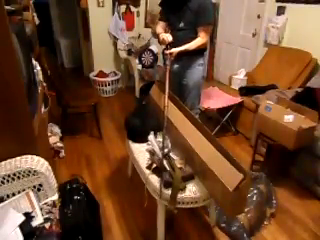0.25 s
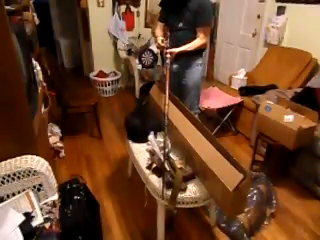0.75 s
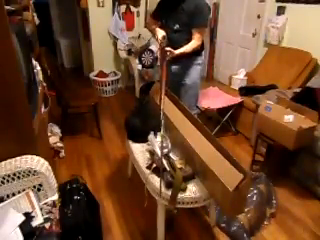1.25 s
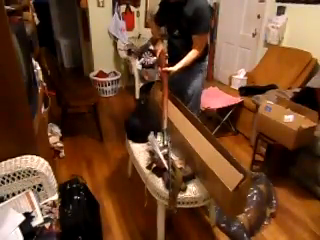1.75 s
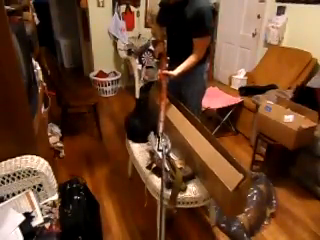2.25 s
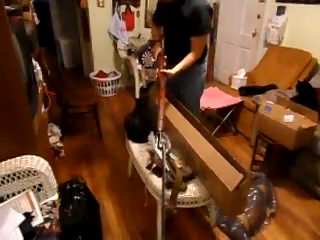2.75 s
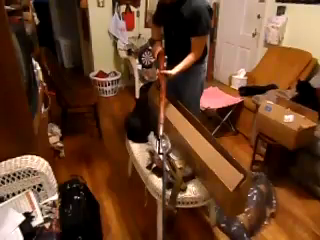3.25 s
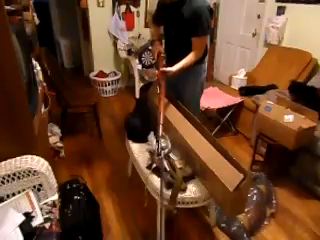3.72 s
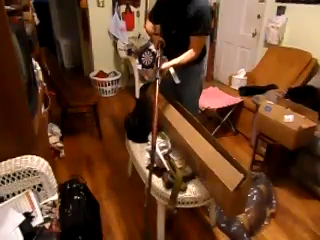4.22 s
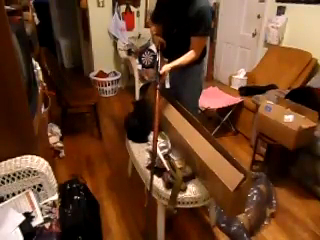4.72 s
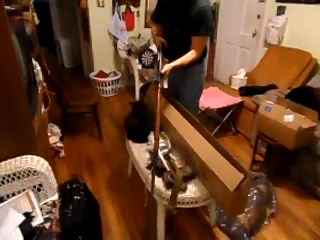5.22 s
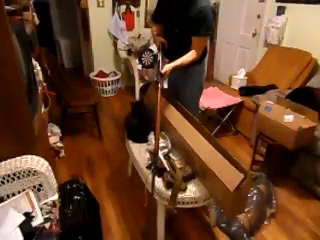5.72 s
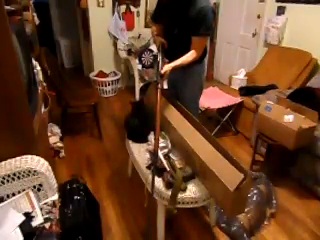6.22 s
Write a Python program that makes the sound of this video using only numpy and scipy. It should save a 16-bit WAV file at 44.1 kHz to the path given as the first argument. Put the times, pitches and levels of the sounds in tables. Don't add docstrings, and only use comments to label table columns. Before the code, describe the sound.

A small camera a few metres away in a furnished room hears steady hiss, faint electrical buzz with a thin high whine, and low floor rumble. From 0 s a rifle bolt is worked: a faint tick, a short steel scrape at 0.1, clacks around 0.22, another slide, then a loud ringing slam at 0.53 and a last short slide ending in a firm clack at 0.72. A light tap comes at 0.9 and a buckle tick at 1.1. Soft hand rubs and knocks follow from 1.3 to 1.6. From 1.8 to 2.45 the butt drags and bumps the boards with dull low thuds. Between 2.7 and 3.7 the swivel knocks the hollow stock amid tiny jingles. Then near quiet, with one faint bump at 4.46, until a sharp, bright striker snap at 6.03 with a brief room tail and low floor thud, fading into hiss.

```python
import sys
import numpy as np
from scipy import signal
from scipy.fft import rfft, irfft
from scipy.io import wavfile
from scipy.ndimage import uniform_filter1d

SR = 44100
rng = np.random.default_rng(int(sys.argv[2]) if len(sys.argv) > 2 else 0)


def to_wav(s):
    ch = np.atleast_2d(s).T
    pcm = np.round(np.clip(ch, -1, 1) * 32767)
    wavfile.write(sys.argv[1], SR, pcm.astype(np.int16))


def elevation(decibels):
    levels = np.asarray(decibels, float)
    return 10 ** (levels / 20)


N = 285327

# (frequency [Hz], density [dB per Hz])
HISS = [(180, -1), (300, -2), (970, -3.5), (3830, -10.5), (4590, -12), (8750, -15.5), (10100, -15),
        (11200, -17), (15600, -13.5)]
HISS_DB, HISS_EDGE_HZ = -65, 15760
FRAME_HZ, ROW_HZ, WHINE_HZ = 29.976, 1320, 9884
EDGE_HZ = 15880

# (frequency [Hz], time to fall 60 dB [s])
ROOM_DECAY = [(150, 0.069), (500, 0.26), (1500, 0.18), (3000, 0.2), (6500, 0.19), (10000, 0.13),
              (15000, 0.13)]

# (time [s], level over the quiet floor [dB])
FLOOR_SWELL = [(0, 4.5), (.15, -1), (0.349, 3.5), (.8, 9.5), (1.1, 2), (1.7, -0.5), (1.92, 9), (2.15, -4),
               (2.4, 11), (2.6, 3), (3.299, -2), (4.3, 3.5), (5.101, -0.5), (6.0, -0.5), (6.47, 3)]
RUMBLE_DB, CREAK_DB, RUMBLE_SHARE = -54, -66, 0.43
# (time [s], level [dB], time to fall 30 dB [s])
JOIST_THUDS = [(1.8, -62, 0.05), (1.875, -51, 0.32), (1.991, -52, 0.41), (2.197, -65, 0.16),
               (2.36, -50, 0.088), (2.392, -49, 0.046), (2.439, -52, 0.43), (6.02, -43.5, 0.082)]
JOIST_HZ = 21.7

# (frequency [Hz], width [Hz], level [dB])
BOARD_MODES = [(88, 26, -0.5), (235, 15, 3), (352, 10, -10), (760, 29, 7)]
BUTT_AT = [1.797, 1.871, 2.02, 2.202, 2.266, 2.359, 2.391, 2.421, 4.46]
# (level [dB], upper edge of the push [Hz])
BUTT_BUMPS = [(-49, 320), (-48, 600), (-59, 570), (-46.5, 310), (-57.5, 850), (-43.5, 620), (-35, 265),
              (-31.5, 82), (-58, 580)]
BUMP_S = 0.011
DRAG_S, DRAG_LENGTH_S, DRAG_DB = 1.79, 0.274, -60

# (time [s], level [dB], resonance [Hz], low thump [dB])
HANDLING = [(1.31, -48, 2290, -12), (1.3799, -49.5, 1460, 6.5), (1.4175, -47, 2170, -8),
            (1.4509, -52, 2230, 0), (1.5484, -46, 1870, -16), (1.939, -45, 1390, -19),
            (2.157, -47.5, 2350, -16), (2.221, -51, 2440, 4), (2.266, -45.5, 1870, -3),
            (2.3691, -39, 2110, -0.5), (2.3912, -42.5, 2600, -22), (2.417, -44.5, 1600, -11.5),
            (3.3154, -50, 1610, -11), (3.5435, -54, 1640, -9)]
HAND_FIZZ_DB, HAND_RUB_S = -63.5, .0095
# (time [s], level [dB], resonance [Hz], fizz [dB])
BUCKLE = [(1.1154, -41.5, 6260, -10), (1.2682, -51, 9500, -2), (1.531, -59, 11000, 5),
          (2.6788, -48.5, 4230, -5), (2.727, -52, 8500, -6), (2.9874, -48, 4370, -9),
          (2.9997, -42, 6260, -7), (3.0073, -42, 4350, -18), (3.0677, -51, 4720, -2.5),
          (3.0702, -48, 6900, -12), (3.4304, -54, 9600, -11), (3.6042, -49, 4750, -21.5),
          (3.682, -56, 9420, -10)]
BUCKLE_THUMP_DB, JINGLE_S = -13.5, .008
KNOCK_AT = [2.7262, 3.1697, 3.4307, 3.6832]
# (level [dB], resonance [Hz])
STOCK_KNOCKS = [(-38.5, 2220), (-42, 2130), (-36.5, 2060), (-37.5, 2100)]
KNOCK_THUMP_DB, KNOCK_FIZZ_DB, KNOCK_S = -23, -27, 0.0052

# (time [s], contact pressure level [dB])
SLIDES = [
    [(0.108, -52), (.116, -40), (0.13, -33), (.16, -43), (0.21, -51)],
    [(0.39, -66.5), (.42, -57), (0.47, -53.5), (.49, -40.5), (0.53, -36)],
    [(0.6, -40), (0.66, -53), (0.72, -50.5)],
]
SLIDE_BODY_DB = [-7, 4, 3]
SLIDE_RASP_DB = [-2, 0, -5]
# (frequency [Hz], width [Hz], level [dB])
RACEWAY_MODES = [(3100, 300, -5), (4500, 250, -3), (6000, 300, 2), (7200, 400, -3), (9200, 300, 2),
                 (10000, 350, 2), (14200, 500, -3)]

# (time [s], level [dB], stock thump [dB], edge brightness [dB])
LATCH_TICK = [(0.8962, -37.5, -14, -28)]
STRIKER_AT = [
    6.0222,
    6.0242,
    6.0285,
    6.0325,
    6.0478,
]
# (knock at 2 kHz [dB], stock thump [dB], edge brightness [dB])
STRIKER_HITS = [(-42.5, 5.5, -1), (-29, -3.5, 3.5), (-16, -31.5, 11), (-45, -20, 9), (-53, -16, 10)]
STRIKER_HZ = [1130, 1450, 2800, 2680, 4400, 6400, 8250, 9300, 13300, 14200, 15300]
# (width [Hz], level [dB])
STRIKER_RINGING = [(180, 3), (200, 1), (50, 3.5), (71.1, 5.5), (80, 4.5), (248.6, 4), (303, -3), (59.4, 13),
                   (411, -5), (170, 13), (295, -8)]
# (time [s], knock at 2 kHz [dB], stock thump at 500 Hz [dB], edge brightness at 12 kHz [dB])
BOLT_HITS = [(0.0, -53.5, 9, -11), (0.0686, -37.5, -10.5, -30), (0.2215, -33.5, -7.5, -4),
             (0.2248, -28, -20, 3.5), (0.2355, -25, -10.5, -15.5), (0.3086, -42.5, -1, -15),
             (0.445, -45.5, 2.5, -24), (0.462, -38.5, -3, -23), (0.484, -42, -25, -1.5),
             (0.503, -27, -17, -16), (0.5294, -10.5, -20.5, 2.5), (0.5328, -15, -8.5, -17),
             (0.5397, -16.5, -24, -8), (0.6597, -29, -9, -14), (0.7245, -22.5, -4.5, 3),
             (0.7285, -21.5, -13.5, -10.5), (1.1149, -49, -11, -1.5)]
# (frequency [Hz], width [Hz], level [dB])
BOLT_MODES = [(338, 27, 9), (1010, 160, -3.5), (1410, 310, 2), (2680, 50, 6.5), (2910, 54, 7),
              (3581, 660, -0.5), (5466, 570, -17), (6590, 250, -2.5), (8200, 640, 1.5), (9920, 410, -1),
              (11850, 595, -11), (14600, 490, 4.5), (15400, 420, 0.5)]
BOLT_RATTLE_S, STRIKER_RATTLE_S, TICK_S = .006, .0021, .003


def evened(x):
    return x / np.sqrt(np.mean(x ** 2) + 1e-20)


def read(points, hz):
    f, value = np.transpose(points)
    return np.interp(np.log(hz + 1), np.log(f + 1), value)


def add(mix, s, sound):
    part = mix[round(s * SR):][:len(sound)]
    part += sound[:len(part)]


def coloured(x, points):
    log_gain = np.log(elevation(read(points, abs(np.fft.fftfreq(2048, 1 / SR)))))
    response = np.fft.ifft(np.exp(np.conj(signal.hilbert(log_gain)))).real
    return signal.oaconvolve(x, response)[:len(x)]


def shaped_noise(points, edge_hz=SR):
    hz = np.fft.rfftfreq(N, 1 / SR)
    spectrum = rfft(rng.standard_normal(N)) * elevation(read(points, hz)) * (hz < edge_hz)
    return evened(irfft(spectrum, N))


def clicks(count, per_s, spread_db):
    when, sign, size = rng.random((count, 3)).T
    return (when < per_s / SR) * np.sign(sign - .5) * elevation(-spread_db * np.log(1 - .98 * size))


def resonant(x, modes):
    t = np.arange(8000) / SR
    ring = np.zeros(len(t))
    for hz, width, db in modes:
        decay = np.exp(-np.pi * width * t)
        ring += elevation(db) * 2 * np.pi * width / SR * decay * np.cos(2 * np.pi * hz * t)
    return signal.oaconvolve(x, ring)[:len(x)]


def rattle(length, per_s, rise):
    t = np.arange(8192) / SR
    shape = np.exp(-t / max(length, .0005)) * np.minimum(t / rise + 0.068, 1)
    burst = clicks(len(t), per_s, 1.3) * shape
    for _ in range(4):
        burst = irfft(np.exp(1j * np.angle(rfft(burst))))
        burst *= shape / np.sqrt(abs(uniform_filter1d(burst ** 2, size=120)) + 1e-12)
    return burst / np.linalg.norm(burst)


def camera():
    t = np.arange(N) / SR
    hiss = elevation(HISS_DB) * shaped_noise(HISS, HISS_EDGE_HZ)
    frame, place = np.divmod(t * FRAME_HZ, 1)
    reading = uniform_filter1d(1. * (abs(place - .56) < .125), 60)
    start = rng.random((int(frame[-1]) + 1, 2))[frame.astype(int)]
    turns = ROW_HZ * place / FRAME_HZ + start[:, 0]
    comb = sum(np.cos(2 * np.pi * k * turns + .4 * k * k) for k in range(3, 13))
    fizz = coloured(rng.standard_normal(N), [(2500, -20), (6000, 0), (15000, 1), (15900, -30)])
    buzz = elevation(-79 + 4 * start[:, 1]) * reading * (comb + 1.3 * fizz)
    between_frames = abs(place - .26) <= .05
    skipped = (frame % 15 == 8) & (place <= .7)
    running = uniform_filter1d(1. * ~(between_frames | skipped), 60)
    whine = elevation(-75.0) * running * np.sin(2 * np.pi * WHINE_HZ * t)
    return hiss + buzz + whine


def room(x):
    out, turn = np.zeros(N), np.arange(N) / SR * 16.
    for k in range(3):
        taps, at = np.zeros(SR // 2), np.arange(140, SR // 2 - 3, 3)
        taps[at + rng.integers(0, 3, len(at))] = rng.choice([-1., 1.], len(at))
        hz, t, z = signal.stft(taps, SR, nperseg=128)
        decay_db = -60 * t / read(ROOM_DECAY, hz)[:, None]
        decay = np.hypot(elevation(decay_db), elevation(-13 + 0.46 * decay_db))
        tail = signal.istft(z * decay, SR, nperseg=128)[1]
        share = np.sqrt(2 / 3) * np.cos(turn + k * np.pi / 3)
        out += signal.fftconvolve(x * share, tail / np.linalg.norm(tail))[:N]
    return out


def boards():
    s, swell_db = np.transpose(FLOOR_SWELL)
    t = np.arange(N) / SR
    rumble = shaped_noise([(6, -10.5), (18, 7.5), (40, -3), (65, -2), (100, -14.5), (200, -48)])
    creak = shaped_noise([(50, -49.5), (110, -0.5), (300, -5.5), (600, -15), (1500, -32.0)])
    swell_db = np.interp(t, s, swell_db)
    out = elevation(RUMBLE_DB + RUMBLE_SHARE * swell_db) * rumble + elevation(CREAK_DB + swell_db) * creak
    u = t[:15000]
    for s, db, t30 in JOIST_THUDS:
        decay = elevation(db + 16.5 - 60 * u / t30 / 2)
        add(out, s, -decay * np.sin(2 * np.pi * JOIST_HZ * u) * np.minimum(u / 0.0038, 1))
    return out


def drag():
    slips = clicks(round(DRAG_LENGTH_S * SR), 900, 2)
    colour = [(120, -11), (250, -1), (400, -3), (800, -20), (3000, -42)]
    hum = coloured(resonant(slips, BOARD_MODES), colour)
    return elevation(DRAG_DB) * evened(hum) * signal.windows.tukey(len(slips), .4)


def butt():
    out = np.zeros(N)
    for s, (db, hz) in zip(BUTT_AT, BUTT_BUMPS):
        push = rattle(BUMP_S, 16000, rise=0.0026)
        colour = [(30, -8), (100, -1.5), (hz, 0), (1.7 * hz, -12), (5000, -40)]
        add(out, s, elevation(db + 40.5) * coloured(push + resonant(push, BOARD_MODES), colour))
    add(out, DRAG_S, drag())
    return out


def touches(rows, thump_db, fizz_db, length, skirt_db, below, rise):
    out = np.zeros(N)
    for s, db, hz, thump, fizz in np.broadcast(*rows[:3], thump_db, fizz_db):
        low_side = [(0.66 * below * hz, skirt_db), (below * hz, -2.5)]
        high_side = [(1.04 * hz, -2.5), (1.225 * hz, skirt_db)]
        ends = [(100, thump - 5), (500, thump + 1.5), (13000, fizz - 2.5), (16000, fizz + 2.3)]
        colour = sorted([*low_side, (hz, 0), *high_side, *ends])
        add(out, s, elevation(db + 31.5) * coloured(rattle(length, 16000, rise), colour))
    return out


def handling():
    hand, buckle = np.transpose(HANDLING), np.transpose(BUCKLE)
    knock = (KNOCK_AT, *np.transpose(STOCK_KNOCKS))
    out = touches(hand, hand[-1], HAND_FIZZ_DB - hand[1], HAND_RUB_S, skirt_db=-5.5, below=1.0, rise=0.0045)
    out += touches(buckle, BUCKLE_THUMP_DB, buckle[-1], JINGLE_S, skirt_db=-14.5, below=0.95, rise=0.0041)
    out += touches(knock, KNOCK_THUMP_DB, KNOCK_FIZZ_DB, KNOCK_S, skirt_db=-16, below=.72, rise=.003)
    return out


def slide(pressure, body_db, rasp_db):
    s, db = np.transpose(pressure)
    t = np.arange(s[0], s[-1], 1 / SR)
    grit = clicks(len(t), 20000, 2)
    rasp = evened(coloured(grit, [(1000, -13), (2500, 4), (4500, 9.5), (8000, -5), (16000, -17)]))
    dull = evened(coloured(grit, [(200, -15.5), (900, 6), (1500, 9.5), (3000, 5), (6000, -5)]))
    steel = evened(coloured(resonant(grit, RACEWAY_MODES), [(1500, -30), (3000, -4), (9000, 0)]))
    scrape = steel + elevation(rasp_db - 5) * rasp + elevation(body_db) * dull
    return s[0], elevation(np.interp(t, s, db)) * scrape * signal.windows.tukey(len(t), .08)


def hits(rows, modes, length, ring_db, bass_db, steel_db, steel_share):
    out = np.zeros(N)
    for s, db, stock_db, edge_db in rows:
        crack = rattle(length, 20000, rise=0.4 * length)
        stock = [(60, stock_db + bass_db), (500, stock_db + 3.0), (2000, 0.014)]
        steel = [(5000, steel_db + steel_share * edge_db - 3.0), (12000, edge_db - 0.5), (16000, edge_db - 5.0)]
        blow = crack + elevation(ring_db) * resonant(crack, modes)
        add(out, s, elevation(db + 28) * coloured(blow, stock + steel))
    return out


def action():
    striker = [(s, *row) for s, row in zip(STRIKER_AT, STRIKER_HITS)]
    striker_modes = [(hz, *row) for hz, row in zip(STRIKER_HZ, STRIKER_RINGING)]
    out = hits(BOLT_HITS, BOLT_MODES, BOLT_RATTLE_S, ring_db=-4.0, bass_db=-19.0, steel_db=4.5, steel_share=0.4)
    out += hits(striker, striker_modes, STRIKER_RATTLE_S, ring_db=2.5, bass_db=10.5, steel_db=.6, steel_share=0.66)
    out += hits(LATCH_TICK, BOLT_MODES, TICK_S, ring_db=0, bass_db=-17.5, steel_db=-2, steel_share=.45)
    for stroke in zip(SLIDES, SLIDE_BODY_DB, SLIDE_RASP_DB):
        add(out, *slide(*stroke))
    return out


def scene():
    rifle = action() + handling()
    direct = elevation(-3) * rifle
    reverberant = elevation(-2.0) * room(rifle)
    return (direct + reverberant + butt() + boards() + camera())[None]


def low_pass(x):
    return signal.sosfilt(signal.butter(12, 16830, fs=SR, output="sos"), x)


def record(dry):
    power_db = 10 * np.log10(abs(uniform_filter1d(dry[0] ** 2, 300)) + 1e-12)
    fall = np.arange(N) * 14.3 / SR
    held_db = np.maximum.accumulate(power_db + fall) - fall
    over_db = np.maximum(held_db + 19.0, 0)
    ducked = dry / elevation(0.52 * uniform_filter1d(over_db, 200, origin=99))
    limited = np.tanh(ducked / .86) * .86
    lowpass = signal.firwin(251, EDGE_HZ, window=("kaiser", 8), fs=SR)
    return low_pass(signal.oaconvolve(limited, lowpass[None], "same"))


dry = scene()
out = record(dry)
to_wav(out)
```